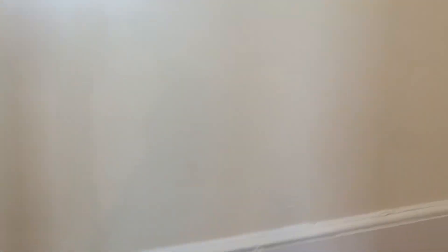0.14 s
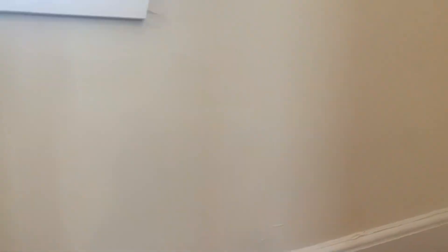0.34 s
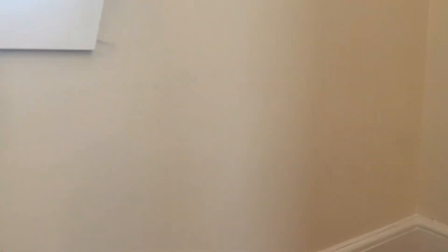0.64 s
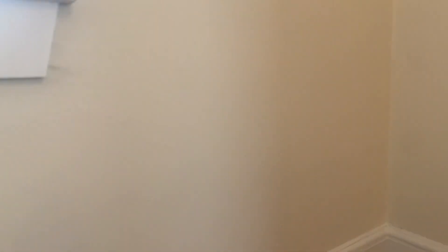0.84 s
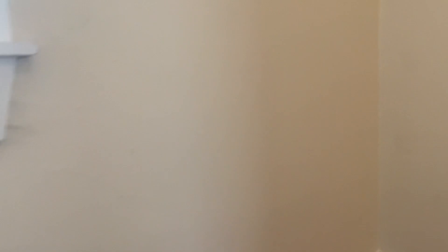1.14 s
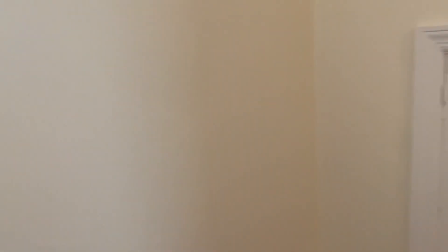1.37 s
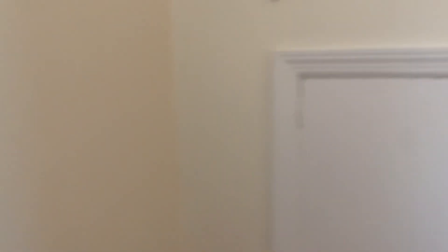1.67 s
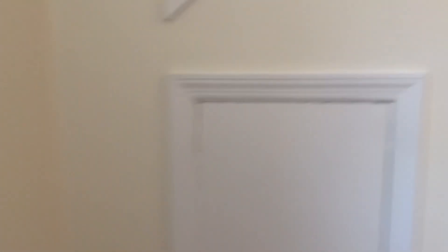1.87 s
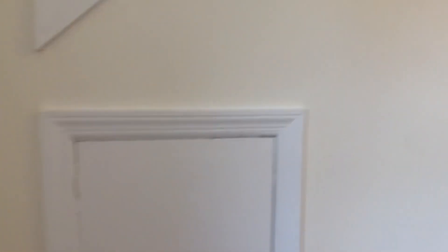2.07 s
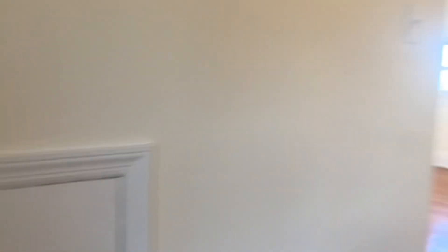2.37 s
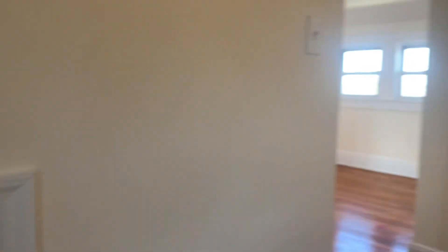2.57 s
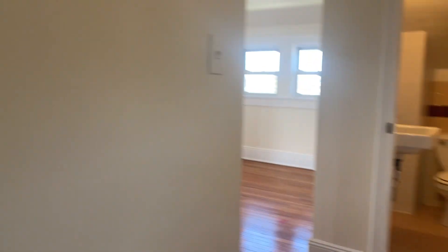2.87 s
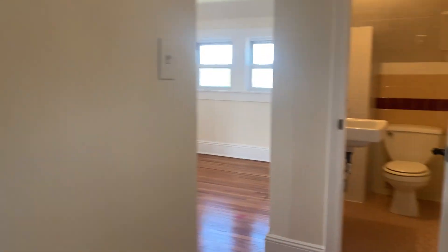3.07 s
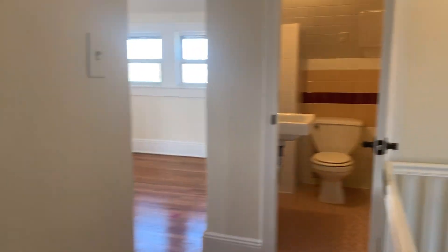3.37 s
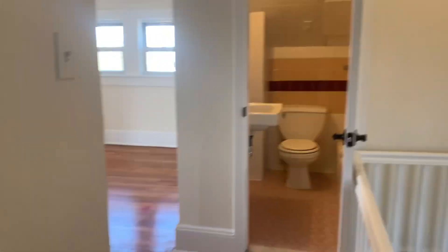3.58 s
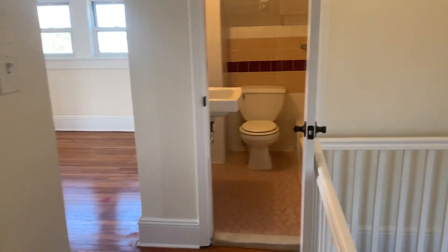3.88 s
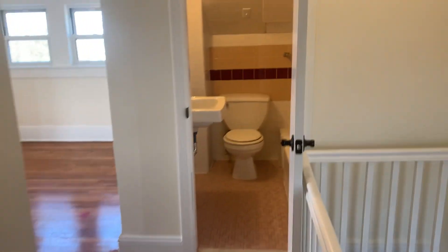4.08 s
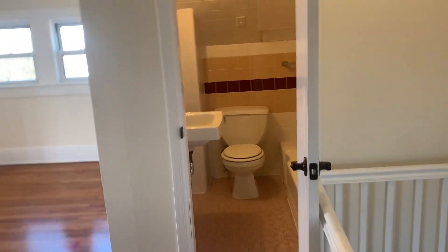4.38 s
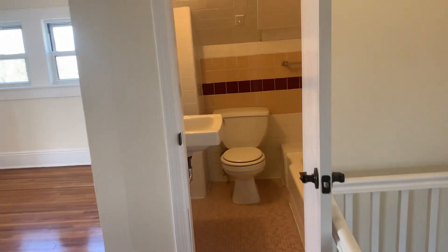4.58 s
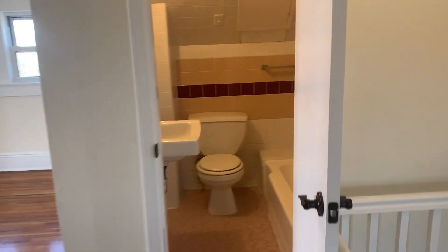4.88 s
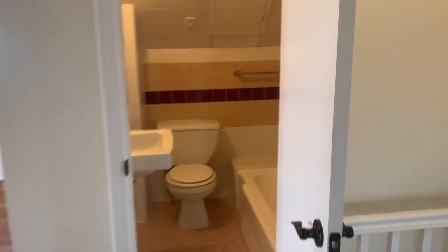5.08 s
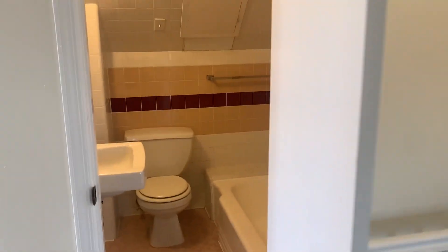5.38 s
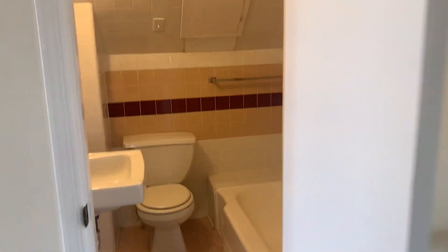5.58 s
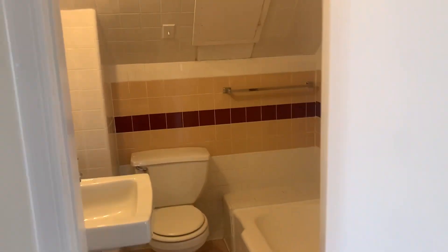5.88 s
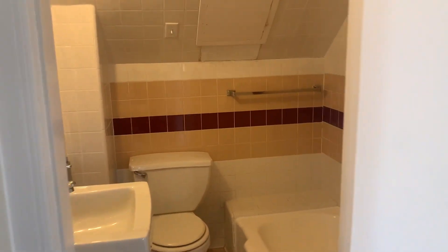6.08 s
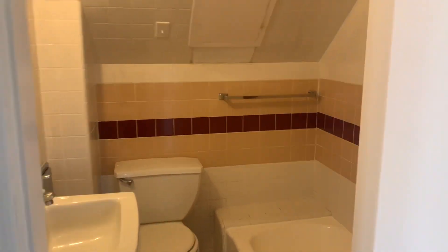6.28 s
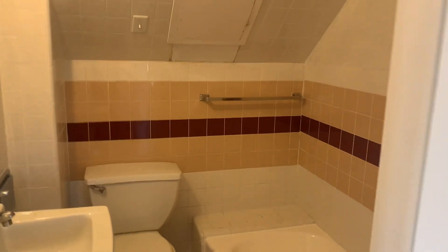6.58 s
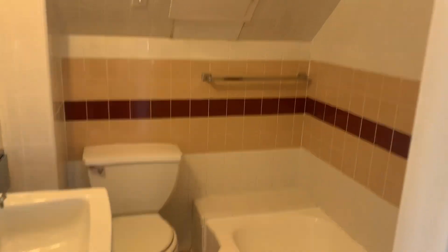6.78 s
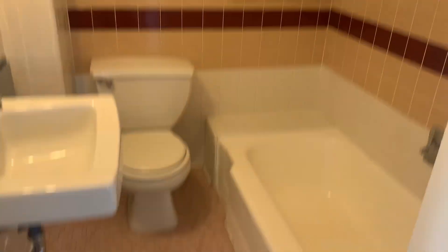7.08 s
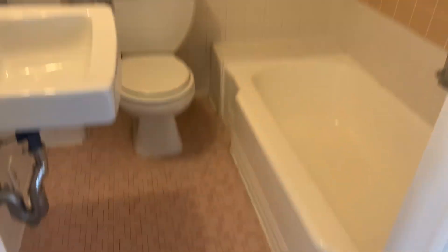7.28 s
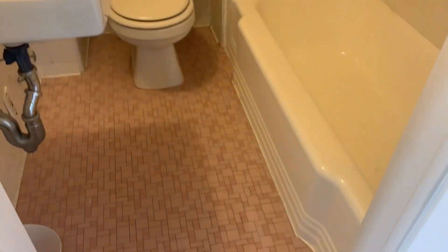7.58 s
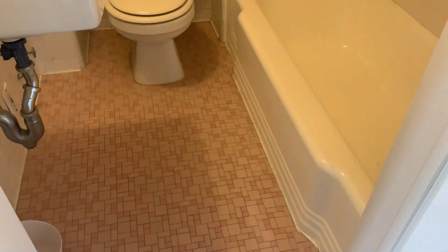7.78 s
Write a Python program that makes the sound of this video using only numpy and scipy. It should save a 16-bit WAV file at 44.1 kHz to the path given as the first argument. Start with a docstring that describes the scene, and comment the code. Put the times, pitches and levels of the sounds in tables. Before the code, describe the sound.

Hard shoes step across a bare wooden landing, heard from a handheld phone. A couple of steps, then a loud dry rattling bump on the phone's case, then uneven clusters of hollow thuds and clacks with light scuffs and a tiny squeak. Boards ring briefly, empty rooms echo. Steps thin out at a bathroom, leaving low quiet room rumble.

```python
"""Someone in hard shoes walks a bare upstairs landing into a tiled bathroom, phone in hand as the microphone.
Heels and toes ring joist and floorboards, with clack and tick from the hard sole and echoes from the rooms.
Soles scuff as shaped noise and squeak as wavering tones; single boards ring out dry, close to the phone.
Fingers bump the phone, early and again near the end: damped case tones, rattle, click and a slowing swing.
A quiet house lies under it all as filtered noise: rumble, drone, murmur of air and hiss."""
import sys
import numpy as np
from scipy import signal
from scipy.fft import rfft, irfft, next_fast_len
from scipy.io import wavfile
from scipy.ndimage import uniform_filter1d

SR = 44100
rng = np.random.default_rng(int(sys.argv[2]) if len(sys.argv) > 2 else 0)


def wrap_up_sound(samples):
    """Save the sound to the file named by the first command line argument, as 16-bit audio."""
    columns = np.atleast_2d(samples).T
    # keep every value between -1 and 1, then stretch to whole-number steps
    tamed = np.clip(columns, -1, 1)
    steps = np.round(tamed * 32767).astype(np.int16)
    wavfile.write(sys.argv[1], SR, steps)


N = 350167
LEAD = 1024  # samples kept ahead of each contact

# stereo width of the rooms' sound: hz [Hz], side_minus_mid_db [dB]
ROOM_WIDTH = [(60, -12.5), (200, -16), (380, -5), (700, -2.5), (1300, -1), (2400, 0.5), (15000, 0.5)]


def undb(db):
    """Amplitude factor of a level in dB."""
    return 10 ** (np.asarray(db) / 20)


def unit(x):
    """Scale to an RMS of one."""
    return x / np.sqrt(np.mean(x ** 2))


def gains(points, size):
    """Gain at each FFT bin, from (Hz, dB) points joined along log frequency."""
    hz, db = np.transpose(points)
    bins_hz = np.fft.rfftfreq(size, 1 / SR)
    return undb(np.interp(np.log(bins_hz + 1), np.log(hz), db))


def shape(x, response):
    """Multiply the spectrum by response(size)."""
    size = next_fast_len(x.shape[-1], True)
    return irfft(rfft(x, size) * response(size), size)[..., :x.shape[-1]]


def colour(x, points):
    """Filter by (Hz, dB) points."""
    return shape(x, lambda size: gains(points, size))


def add(out, x, s):
    """Mix x into out from time s, trimming what falls outside."""
    i = int(s * SR)
    first, last = max(-i, 0), min(x.shape[-1], out.shape[-1] - i)
    out[..., i + first:i + last] += x[..., first:last]


def curve(s, value):
    """Straight lines between values at times s, over the whole scene."""
    return np.interp(np.arange(N) / SR, s, value)


def walk(rate):
    """Random levels held 1 / rate s and slewed twice."""
    hold = int(SR / rate)
    levels = np.repeat(rng.standard_normal(N // hold + 1), hold)
    return uniform_filter1d(uniform_filter1d(levels, hold), hold)[:N]


def stereo(mid, side):
    """Left and right from mid and side."""
    return np.array([mid + side, mid - side])


def mode(hz, t60, size):
    """Response of one damped mode, a two-pole resonance, at each FFT bin."""
    pole = np.exp(2j * np.pi * hz / SR - np.log(1000) / (t60 * SR))
    turn = np.exp(-2j * np.pi * np.fft.rfftfreq(size))
    return 1 / ((1 - pole * turn) * (1 - np.conj(pole) * turn))


def wood(size, spread_db=4.0):
    """Upper notes of the floor; where the foot lands decides, at random, how strongly each answers."""
    # resonances: hz [Hz], width_hz [Hz], level_db [dB before the random spread]
    floor_notes = [(621, 220, 3.5), (800, 58, -6.5), (1080, 630, -1.5), (1276, 28, -1.5), (1490, 110, -6),
                   (2300, 510, 15)]
    bins_hz = np.fft.rfftfreq(size, 1 / SR)
    place_db = spread_db * rng.standard_normal(len(floor_notes))
    total = 0
    for (hz, width_hz, level_db), extra_db in zip(floor_notes, place_db):
        total = total + undb(level_db + extra_db) / (1 + (2 * (bins_hz - hz) / width_hz) ** 2)
    return total


def room(build_s, stretch=1, late_db=-18, late_stretch=1.88, patchy_db=2.0, size=32768):
    """Echoes from one spot, mid and side: noise that dies octave by octave in uneven clumps,
    with a slower tail from the next rooms."""
    # echo decay ahead of the stretch: hz [Hz], t60_s [s]
    decay = [(50, 0.7), (150, 0.51), (400, 0.65), (1100, 0.63), (3000, 0.69), (8000, 0.3), (15000, 0.21)]
    decay_hz, decay_s = np.transpose(decay)
    t, hz = np.arange(size) / SR, np.fft.rfftfreq(size, 1 / SR)
    noise = rfft(rng.standard_normal((2, size)))
    at = np.array(t[::1024].tolist() + [t[-1]])
    clumps = rng.standard_normal((10, len(at)))
    echoes = 0
    for k, low_hz in enumerate(25 * 2. ** np.arange(10)):
        t60 = stretch * np.interp(np.log(low_hz * np.sqrt(2)), np.log(decay_hz), decay_s)
        near = undb(-60 * at / t60)
        next_rooms = undb(late_db - 60 * at / (late_stretch * t60))
        band = irfft(noise * ((hz >= low_hz) & (hz < 2 * low_hz)))
        echoes = echoes + band * np.interp(t, at, (near + next_rooms) * undb(patchy_db * clumps[k]))
    build_up = (1 - np.exp(-t / build_s)) ** 2
    end_fade = np.clip((t[-1] - t) * 10, 0, 1)
    return echoes * build_up * end_fade


def house():
    """Filtered noise split into wavering rumble, a low drone, a steadier murmur of air, and faint hiss."""
    # noise colour: hz [Hz], level_db [relative dB]
    spectrum = [(15, -30), (32, -0.5), (50, 1.5), (108, -2), (212, -23), (344, -14.5), (840, -18),
                (1890, -25.5), (4000, -28.5), (6700, -35), (9000, -36), (12000, -40), (16000, -47.5)]
    # noise width: hz [Hz], side_minus_mid_db [dB]
    width = [(60, -12), (200, -12), (400, -3), (700, -3), (1300, 0), (15000, 1)]
    # levels along the walk; the small bathroom hums more and hisses less:
    # time_s [s], rumble_db [dB], drone_db [dB, near 230 Hz], hiss_db [dB]
    levels = [(0, -73, -92, -57), (.62, -49.5, -71, -73.5), (1.2, -58.5, -81, -68), (2.4, -61, -71, -67),
              (2.9, -62, -65.5, -63), (3.2, -58, -67.5, -71), (5.3, -57.5, -77, -72.5),
              (6.6, -53, -63.5, -73.5), (7.1, -58.5, -60.5, -77.5), (7.94, -54.5, -55, -82)]
    noise = colour(rng.standard_normal((2, N)), spectrum)
    both = stereo(noise[0], colour(noise[1], width))
    low = colour(both, [(250, 0), (500, -30)])
    high = colour(both, [(1200, -30), (2400, 0)])
    drone = colour(both, [(140, -48), (195, 6.0), (270, -4.5), (380, -56.0)])
    s, rumble_db, drone_db, hiss_db = np.transpose(levels)
    air = unit(both - low - high) * undb(-66.0 + 1.5 * walk(14))
    hiss = unit(high) * undb(curve(s, hiss_db) + 1.5 * walk(14))
    rumble = unit(low) * undb(curve(s, rumble_db) + 1.1 * walk(7.4))
    hum = unit(drone) * undb(curve(s, drone_db) + 1.3 * walk(13.0))
    return rumble + hum + air + hiss


def bumps(size=8192):
    """Knocks carried through the phone's case, so dry: a short ring, a rattle, a click, and a slowing swing."""
    # knocks: start_s [s], ring_db [dB], ring_hz [Hz], ring_t60_s [s], click_db [dB],
    # sag_db [dB], sag_hz [Hz, 10 ms after the start], sag_length_s [s]
    knocks = [(.692, -13, 527, 0.013, -21, -11.5, 102, 0.062),
              (0.738, -16, 570, 0.0085, -30, -62, 116, .01),
              (0.741, -21.5, 480, 0.041, -64, -28, 108, 0.0079),
              (0.813, -23.5, 580, 0.027, -37, -20.5, 113, 0.053),
              (0.8176, -28, 622, 0.027, -41, -42, 103, 0.0081),
              (0.828, -36, 540, 0.043, -47, -22, 116, 0.0065),
              (7.15, -61, 450, 0.018, -64, -41.5, 112, 0.032),
              (7.504, -52, 490, 0.027, -87, -45, 108, 0.021),
              (7.639, -46, 470, 0.014, -80, -44, 111, 0.026),
              (7.864, -56.5, 554, 0.027, -78, -62, 115, .016)]
    # case overtones: ratio [times ring_hz], level_db [dB on top of ring_db]
    overtones = [(1, 9), (1.75, -0.5), (2.95, -20), (4.4, -12)]
    # case width: hz [Hz], side_minus_mid_db [dB]
    width = [(60, -10), (200, -11), (400, -4.5), (1300, 1.5), (8000, 9.5)]
    rattle_colour = [(400, -3), (800, 3), (1500, 2), (2300, -5), (3000, -28), (7000, -57)]
    click_colour = [(1500, 10.5), (2800, -31.5), (6500, 3.0), (9000, -29.0)]
    out, t = np.zeros(N), np.arange(size) / SR
    for s, ring_db, hz, t60, click_db, sag_db, sag_hz, length in knocks:
        fade = (1 - np.exp(-t / 0.0013)) * undb(-60 * t / t60)
        # higher overtones die sooner
        case = sum(undb(db) * np.sin(2 * np.pi * k * hz * t) * fade ** k for k, db in overtones)
        noise = rng.standard_normal((2, size))
        rattle_fade = fade ** 0.93 + undb(-30) * np.exp(-t / 0.025)
        rattle = rattle_fade * unit(colour(noise[0], rattle_colour))
        click_fade = (1 - np.exp(-t / 0.00077)) * np.exp(-t / (0.08 * t60))
        click = click_fade * colour(noise[1], click_colour)
        # pitch falls as one over the root of time
        swing = np.sin(4 * np.pi * sag_hz * np.sqrt(t / 100))
        sag = swing * np.sin(np.pi * np.clip(t / length, 0, 1) ** 0.57)
        knock = undb(ring_db) * (case + undb(-14.5) * rattle)
        knock += undb(click_db) * click + undb(sag_db) * sag
        add(out, knock, s)
    # the phone's two ports move out of step: the side signal is a quarter cycle off
    return stereo(out, shape(out, lambda n: 1j * gains(width, n)))


def rings(size=16384):
    """Single board notes, dry and close: a pair of damped sines with a quick rise, leaning to one side."""
    # notes: start_s [s], pitch_hz [Hz], level_db [dB], t60_s [s]
    notes = [(.066, 632, -36, 0.11), (.35, 1120, -53, 0.045), (1.704, 1510, -41.5, 0.043),
             (1.708, 169, -18.5, 0.067), (1.734, 165, -28.5, 0.19), (1.762, 1317, -38, 0.077),
             (3.283, 1100, -49, 0.027), (3.428, 650, -34, 0.18), (3.475, 617, -39, .1),
             (3.515, 661, -35.5, 0.16), (3.989, 824, -43.5, 0.08), (3.991, 251, -41.5, .13),
             (5.612, 425, -37.5, 0.09), (1.866, 2280, -42, 0.067), (4.113, 406, -36.5, 0.21),
             (4.159, 1194, -39, 0.1), (4.279, 641, -47, 0.41), (4.333, 1250, -51, 0.059),
             (5.012, 1230, -53, 0.073), (6.065, 301.5, -31, 0.18), (6.75, 160, -49, 0.08),
             (1.862, 1334, -34, 0.067), (1.868, 293, -35, 0.21), (3.324, 199, -28, 0.081),
             (5.484, 190, -37.5, 0.58), (5.852, 980, -31.5, 0.038), (5.884, 318, -31, 0.15),
             (6.091, 314, -22.5, 0.15), (6.166, 337, -27.5, 0.063), (6.205, 430.5, -35.5, 0.16),
             (6.775, 323, -34.5, 0.13), (3.745, 430, -37, 0.068)]
    out, t = np.zeros((2, N)), np.arange(size) / SR
    scatter = rng.uniform(-1.65, 1, (len(notes), 2))
    for (s, hz, db, t60), (split, lean) in zip(notes, scatter):
        partner_hz = hz * (1 + 0.03 * split)
        pair = np.sin(2 * np.pi * hz * t) + 0.24 * np.sin(2 * np.pi * partner_hz * t)
        note = undb(db - 60 * t / t60) * (1 - np.exp(-t * hz / 0.56)) * pair
        add(out, stereo(note, 0.35 * lean * note), s)
    return out


def squeaks():
    """Thin squeaks of rubber: short high sines of wavering pitch, centred."""
    # squeaks: start_s [s], pitch_hz [Hz, before the waver], peak_db [dB], length_s [s]
    chirps = [(2.345, 10600, -63, 0.052), (2.448, 10300, -55.5, 0.01)]
    out = np.zeros(N)
    for s, hz, db, length in chirps:
        tone = np.sin(2 * np.pi * np.cumsum(hz * (1 + .04 * walk(600))) / SR)
        out += undb(db) * tone * curve([s, s + 0.28 * length, s + length], [0, 1, 0])
    return stereo(out, 0 * out)


def scuffs():
    """Soles dragging over the boards: dense uneven slips of rubber on varnish, heard through the room."""
    # drags: start_s [s], length_s [s], rasp_db [dB before the room], hiss_above_rasp_db [dB]
    drags = [(1.304, 0.086, -54.5, -31), (2.512, 0.088, -67, -16), (2.61, 0.11, -87, 9),
             (3.37, 0.069, -51, -10), (3.393, 0.13, -52.5, 6.5), (3.484, 0.078, -50.5, -16),
             (4.105, 0.13, -62, -22), (1.83, 0.025, -44, -14), (3.287, 0.022, -46.5, -13),
             (2.622, 0.032, -66, 0), (3.564, 0.025, -75, -10)]
    # hiss colour: hz [Hz], level_db [relative dB]
    hiss_colour = [(4000, -52), (6500, 1), (8500, 2), (10500, 9), (12500, 4), (15500, -3)]
    rasp_colour = [(300, -30), (700, 0.0), (3000, -6.0), (6000, -6.0), (9000, -11)]
    out = np.zeros(N)
    grain = rng.standard_normal((2, N)) * undb(4.9 * rng.exponential(size=N))
    rasp = unit(colour(grain[0], rasp_colour))
    rasp = unit(shape(rasp, lambda size: 1 + undb(-13.5) * wood(size, 0)))
    hiss = unit(colour(grain[1], hiss_colour))
    catch_db = 0.87 * walk(45.27)  # the sole grips and lets go
    for s, length, rasp_db, hiss_db in drags:
        # swells for 59 % of the drag, then fades
        drag = curve([s, s + 0.59 * length, s + length], [0, 1, 0]) ** 2.3
        out += drag * undb(rasp_db + catch_db) * (rasp + undb(hiss_db) * hiss)
    echo = undb(-23.0) * room(0.0012)
    echo[:, 0] += undb(-13.5)  # direct sound
    mid, side = signal.fftconvolve(out[None], echo, axes=1)[:, :N]
    return stereo(mid, colour(side, ROOM_WIDTH))


def step(thud_db, thud_hz, knock_db, board_hz, clack_db, clack_hz, tick_db, contact, direct_db,
         echo_ratio, size=32768):
    """A blow and a rough push ring joist and board; the hard sole adds clack, tick and sizzle; the room answers."""
    # board modes: ratio [times board_hz], t60_s [s], level_db [relative dB, before weighting by ratio squared]
    board_modes = [(1.003, 0.04, 4), (1.55, 0.018, -2), (2.3, 0.015, -14)]
    # colours of the sole's sounds, each: hz [Hz], level_db [relative dB]
    clack_colour = [(250, 2.5), (600, 8.5), (1000, 4), (1450, 0), (1900, -8.5), (4000, -51)]
    tick_colour = [(1700, -5.5), (2400, -0.5), (4000, 1.5), (5500, -5), (8000, -25)]
    sizzle_colour = [(4000, -60), (6500, -1), (8500, -2.5), (11000, -7), (13000, -17.5), (15500, -20)]
    t, contact = np.arange(size) / SR, max(contact, .001)
    push = (1 - np.exp(-t / 0.0024)) * np.exp(-t / contact) * rng.standard_normal((2, size))
    grit_db = 3.0 * np.minimum(rng.exponential(size=size // 64), 2)  # grit under the sole
    push *= unit(np.repeat(undb(grit_db), 64))
    blow = undb(0.5) * t / 0.0013 * np.exp(-t / 0.00075)
    direct = push + blow * np.array([[1], [0]])  # the blow is in the mid only
    heard = rfft(room(contact / 2, echo_ratio) + undb(direct_db) * direct)

    joist = mode(thud_hz, 0.061, size) * mode(thud_hz, 0.012, size)
    soft = gains([(100, -35), (160, 5.0), (700, 9.0), (2500, -20.5)], size)
    board = soft * sum(undb(db) * k * k * mode(k * board_hz, t60, size) for k, t60, db in board_modes)
    # the heel favours one higher note of the wood, about equally at every contact
    peak = mode(clack_hz, 0.16, size)
    peak = peak / peak[np.argmax(np.abs(peak))]
    tick_over_clack_db = tick_db - clack_db
    lift_db = min(9.5 - 0.48 * tick_over_clack_db, 10)
    clack = gains(clack_colour, size) * (1 + wood(size) + undb(lift_db) * peak)
    sizzle_db = tick_db + 0.77 * tick_over_clack_db
    parts = [(thud_db, joist), (knock_db, board), (clack_db, clack),
             (tick_db, gains(tick_colour, size)), (sizzle_db, gains(sizzle_colour, size))]
    body = sum(undb(db) * part / np.sqrt(np.mean(np.abs(part) ** 2)) for db, part in parts)

    mid, side = heard * body
    both = stereo(irfft(mid), irfft(side * gains(ROOM_WIDTH, size)))
    both = np.roll(both, LEAD, axis=1)
    fade_in = np.minimum(np.arange(size) / LEAD, 1) ** 2
    fade_out = np.cos(np.pi / 2 * (t / t[-1]) ** 4)
    return both * fade_in * fade_out


def footsteps():
    """Heel and toe contacts along the walk, with echoes of nearly equal length throughout."""
    # contacts; part levels set each body response before blow, push and echoes drive it:
    # start_s [s], thud_db [dB, joist], thud_hz [Hz], knock_db [dB, board], board_hz [Hz],
    # clack_db [dB], clack_hz [Hz], tick_db [dB], contact_s [s, at least 1 ms is used],
    # direct_db [dB, gain of direct sound against echoes]
    contacts = [(0.0, -36, 70, -47, 267, -40.5, 680, -53, 0.0084, 3.5),
                (0.065, -60, 75, -44.5, 340, -43.5, 710, -52.5, 0.014, 5),
                (0.349, -70, 81, -93, 283, -63.5, 1110, -82, 0.01, 10),
                (0.493, -65, 67.3, -62, 169, -64.5, 580, -82, 0.023, 13),
                (1.345, -45, 141, -44, 265, -52.5, 1320, -60, 0.0073, -5),
                (1.633, -47, 131, -42.5, 254, -50, 1410, -57.5, 0.018, -4),
                (1.705, -35.5, 126, -43.5, 163, -48, 1590, -61, 0.0042, 7),
                (1.76, -66, 137, -42, 173, -44.5, 1360, -60, 0.011, 9),
                (1.862, -46.5, 49, -43.5, 313, -42.5, 780, -50.5, 0.02, 9),
                (2.458, -68, 58, -45, 214, -51.5, 1400, -64.5, 0.011, -3.5),
                (2.482, -39, 87, -40, 302, -52, 706, -61.5, 0.05, -0.5),
                (2.581, -47, 72.6, -53, 272, -50.5, 2300, -56, 0.014, 7.5),
                (2.631, -54, 74, -46.5, 220, -57, 590, -58, 0.011, 8),
                (2.9, -82, 89, -54.5, 232, -54, 1420, -61.5, 0.085, -7.5),
                (3.281, -46, 139, -40, 246, -50.5, 1090, -79, 0.0088, -3),
                (3.311, -51, 65.6, -44.5, 230, -44.5, 807, -50, 0.004, 16.5),
                (3.415, -50, 87.5, -42, 301, -38, 906, -52.5, 0.003, -1),
                (3.548, -47, 95, -48.5, 336, -48.5, 724, -49, 0.013, 6.5),
                (3.715, -83, 58, -44, 330, -50, 1015, -55, 0.0046, 1),
                (3.737, -55, 62, -61.5, 483, -60, 960, -62, 0.022, 14.5),
                (3.987, -82, 85, -45, 269, -53, 806, -93, 0.008, 6),
                (4.099, -50, 131, -65, 420, -47, 1405, -66, 0.003, 4),
                (4.111, -38.5, 132, -42, 417, -42.5, 820, -61, 0.0061, 8.5),
                (4.158, -47, 48.7, -40, 135, -46.5, 1180, -61, 0.009, 5),
                (4.241, -62, 144, -51, 246, -76, 626, -75.5, 0.011, 9),
                (4.279, -59, 56, -60, 665, -62, 650, -62, 0.066, -12),
                (4.437, -60, 54.6, -70.5, 260, -70.5, 880, -70.5, 0.021, 9.5),
                (4.787, -73, 117, -61, 318, -66, 1090, -78.5, 0.0081, 14),
                (4.839, -42, 124, -37, 181, -52, 600, -71, 0.0047, 6.5),
                (4.862, -53, 123, -47, 199, -53.5, 654, -64.5, 0.012, -8),
                (4.92, -52, 111, -58, 181, -58.5, 730, -64.5, 0.0097, 6),
                (5.009, -42, 47.2, -46.5, 210, -53.5, 1077, -71.5, 0.03, 7.5),
                (5.484, -40, 129, -39.5, 202, -52, 502, -63.5, 0.017, -1.5),
                (5.611, -48, 47.3, -46, 302, -48.5, 1013, -64, 0.09, -1.5),
                (5.849, -67, 112, -39, 268, -37, 845, -43.5, 0.033, 1),
                (6.06, -66, 129, -37, 339, -38, 1044, -42, 0.062, -1),
                (6.272, -47, 116, -53, 220.6, -50.5, 647, -58, 0.03, -1.5),
                (6.704, -73, 82, -42, 286, -47.5, 870, -61.5, 0.051, -6.5),
                (6.745, -39.5, 138, -33.5, 169, -39.5, 514, -54.5, 0.0056, -4.5),
                (7.5, -50, 42.5, -81, 201, -62, 700, -73.5, 0.052, -17),
                (1.939, -57.5, 98, -72, 305, -69, 1310, -67, 0.015, 11),
                (1.733, -52, 135, -42, 163, -58, 700, -75, 0.0065, 18),
                (3.326, -60, 119, -45.5, 210, -45, 710, -73, 0.011, 3.5),
                (6.14, -61, 127.3, -39.5, 298, -38.5, 393, -59, 0.014, 4)]
    feet = np.zeros((2, N))
    for s, *blow in contacts:
        echo_ratio = 0.96 if s < 6.5 else 0.98  # landing, then bathroom from 6.5 s
        add(feet, step(*blow, echo_ratio), s - LEAD / SR)
    return feet


def scene():
    """The walk over the quiet house, as it reaches the phone."""
    return footsteps() + scuffs() + squeaks() + rings() + bumps() + house()


def record(dry):
    """The phone drops the deepest bass; its ports share treble with a turning phase; the top is cut."""
    # treble common to both ports: hz [Hz], share_db [dB, capped at 0]
    common_treble = [(4500, -102), (6000, -5.5), (8000, 0.5), (16000, -6.5)]
    in_step_hz, full_turn_hz = 11070, 4910  # in step at the first; a full cycle over the second
    bass_cut = signal.butter(2, 38, "high", fs=SR, output="sos")
    left, right = signal.sosfilt(bass_cut, dry)

    def share(size):
        return np.clip(gains(common_treble, size), 0, 1)

    def turn(size):
        return np.exp(2j * np.pi * (np.fft.rfftfreq(size, 1 / SR) - in_step_hz) / full_turn_hz)

    own = shape(right, lambda size: np.sqrt(1 - share(size) ** 2))
    shared = shape(left, lambda size: share(size) * turn(size))
    top_cut = signal.ellip(10, .2, 70, 16000, fs=SR, output="sos")
    return signal.sosfilt(top_cut, np.array([left, own + shared]))


dry = scene()
out = record(dry)
wrap_up_sound(out)
```